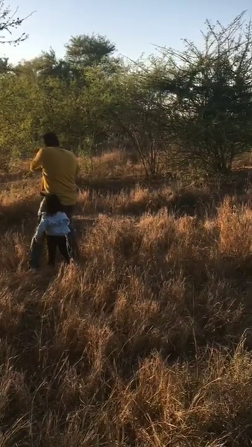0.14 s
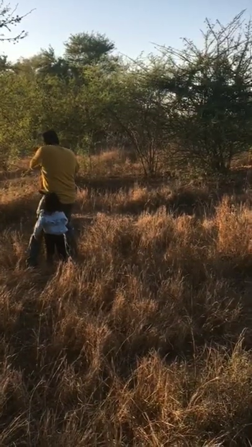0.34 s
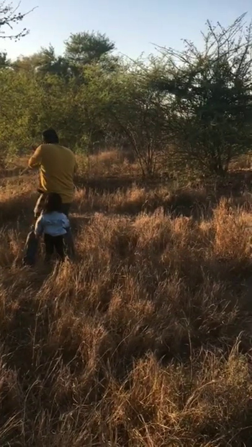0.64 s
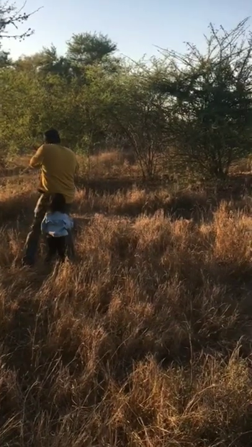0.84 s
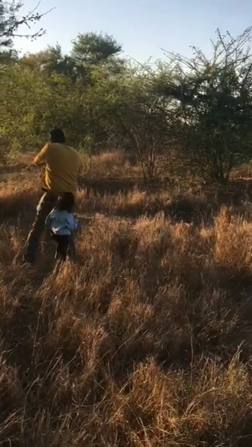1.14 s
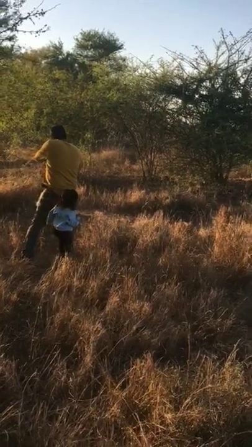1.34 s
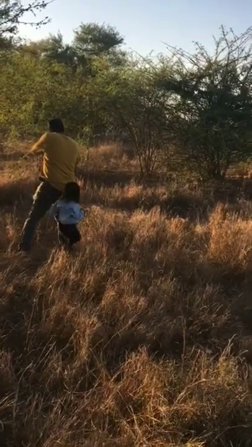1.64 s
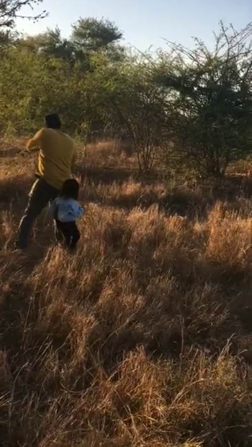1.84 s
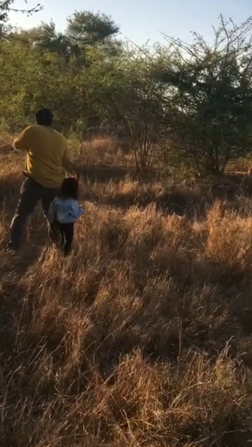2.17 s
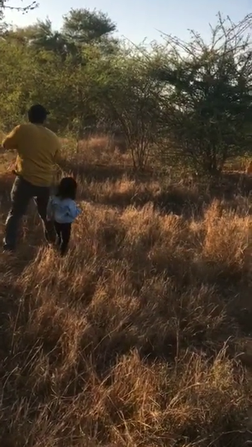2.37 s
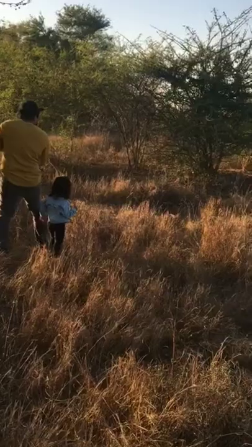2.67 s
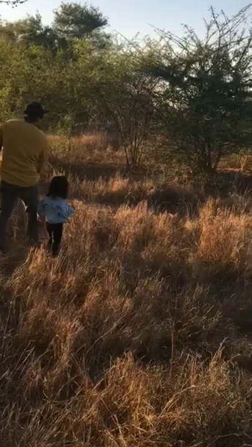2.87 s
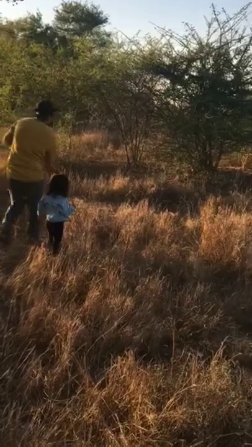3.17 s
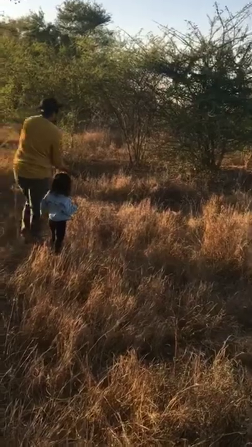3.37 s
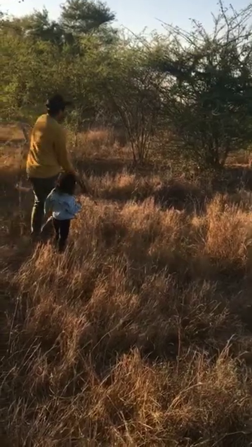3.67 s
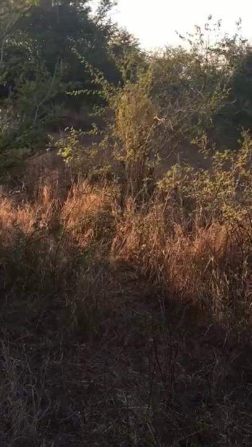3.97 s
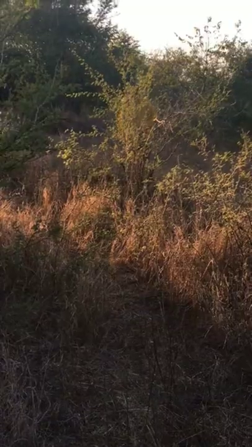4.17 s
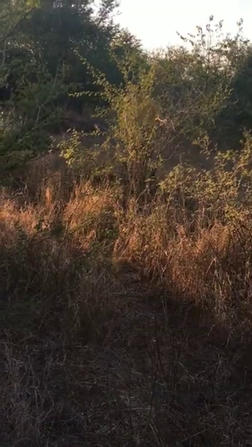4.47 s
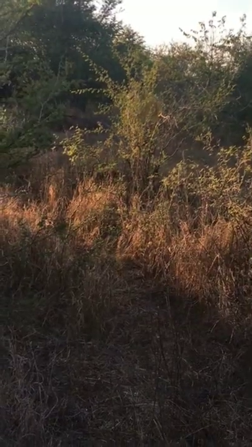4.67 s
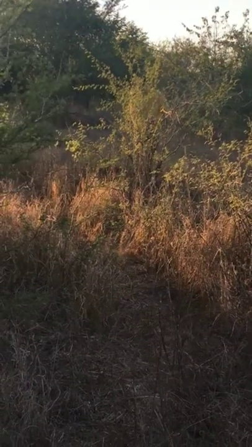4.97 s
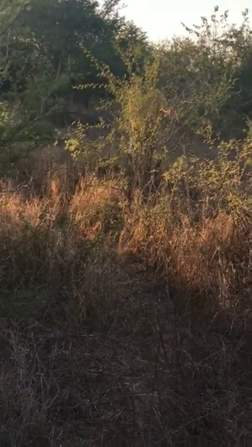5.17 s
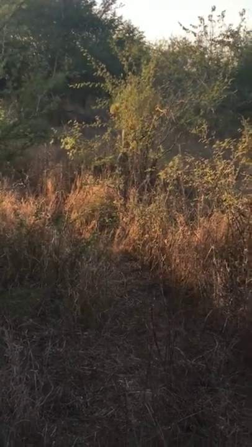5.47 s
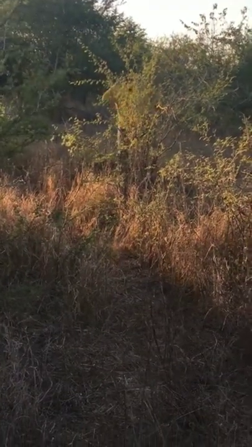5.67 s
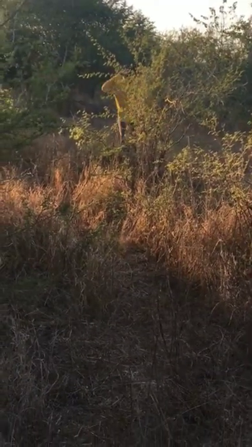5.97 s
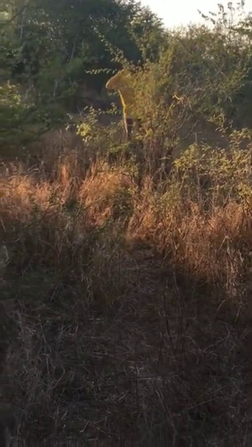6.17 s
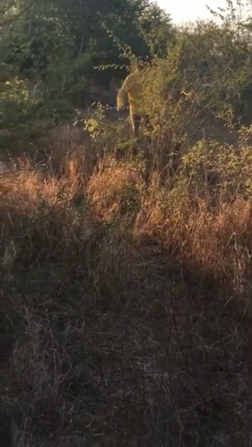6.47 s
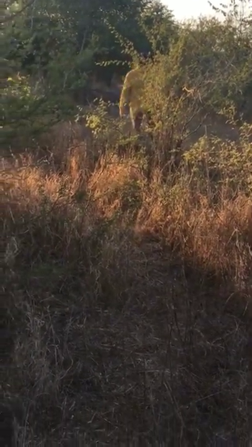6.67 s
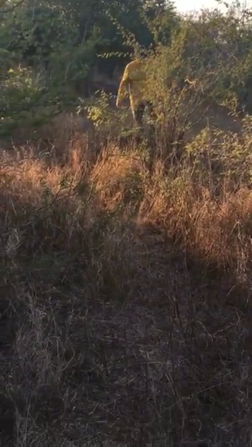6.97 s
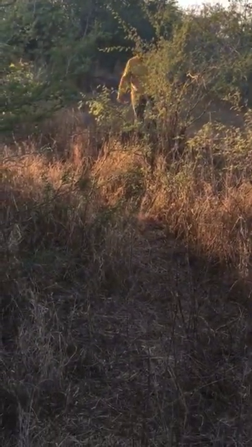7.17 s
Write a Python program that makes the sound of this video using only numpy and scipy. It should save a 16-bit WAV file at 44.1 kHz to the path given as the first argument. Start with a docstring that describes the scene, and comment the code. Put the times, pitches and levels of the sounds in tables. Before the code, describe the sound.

Quiet footsteps swish and crunch through dry grass, with one sharp branch crack, snapping stems, a few knocks and faint birds.

```python
"""Walking through dry grass

Close to a hand-held microphone, stalks swish and litter crunches: friction and fracture release
many tiny impulses. Stems snap, a dry branch cracks, and a few hard knocks ring in damped modes.
Birds call further off, faint thin tones come and go, and the open bush scatters these and the hits.
A breeze buffets the microphone with turbulent pressure. The sound drops out once for a moment."""
import sys
import numpy as np
from scipy import signal
from scipy.fft import rfft, irfft, next_fast_len
from scipy.io import wavfile
from scipy.ndimage import uniform_filter1d

SR = 44100
rng = np.random.default_rng(int(sys.argv[2]) if len(sys.argv) > 2 else 0)


def wav_record(signal):
    """Record a signal, one row per channel, as 16-bit PCM in the file named by sys.argv[1]."""
    frames = np.transpose(np.atleast_2d(signal))
    bounded = np.clip(frames, -1, 1)
    # unit amplitude maps onto the largest positive 16-bit level
    quanta = np.round(bounded * 32767).astype(np.int16)
    wavfile.write(sys.argv[1], SR, quanta)


N = 322812

# loudness of the walk: time_s, stalks_db, litter_db
WALK_LEVELS = [(0, -70.5, -69.5), (.5, -74.5, -72.5), (1.0, -68.5, -69.5), (1.4, -67, -65.5),
               (1.59, -60.5, -55.5), (1.9, -58.5, -58), (2.28, -70.5, -68), (2.5, -71.5, -71),
               (2.72, -64, -69.5), (3.65, -67, -66), (3.78, -60, -59), (4.0, -63, -61.5), (4.2, -73, -67.5),
               (4.44, -73, -68), (4.73, -61.5, -61.5), (5.09, -65, -64), (5.23, -58, -57),
               (5.53, -68.5, -66), (5.81, -62.5, -62), (5.96, -73.5, -68.5), (6.25, -68.5, -66.5),
               (6.99, -67.5, -64.5), (7.16, -59.5, -64.5)]
# spectra of light stalks and of trodden litter: frequency_hz, density_db
SWISH_SPECTRUM = [(2500, -23.5), (4000, -6), (5500, 6), (7500, 5), (9800, 7.5), (11400, -3.5),
                  (12400, -0.5)]
CRUNCH_SPECTRUM = [(400, -10), (900, -2), (1500, -2.5), (2200, 0.5), (3400, 2.5), (4600, 0.5), (5800, -4.5),
                   (7000, -21), (9000, -25)]
# interference dips from the bounce off the soil: centre_hz, width_hz, gain_db
GROUND_DIPS = [(3000, 1200, -3.5), (5000, 260, -7)]
def grass():
    """Many small contacts sum to noise; reflection from the soil partly cancels some bands."""
    stalks_db, litter_db = curves_at(WALK_LEVELS, np.arange(N) / SR)
    swish = coloured(crackle(N, per_s=480, spread_db=7.5, grain_s=.0019, hiss=3.6), SWISH_SPECTRUM)
    crunch = coloured(crackle(N, per_s=460, spread_db=3, grain_s=.005, hiss=1), CRUNCH_SPECTRUM)
    out = gain_of(stalks_db + .65 * drift(N, 900, passes=2)) * swish
    out += gain_of(litter_db + drift(N, 900, passes=2)) * crunch
    for row in TUFT_SWEEPS:
        add(out, *tuft_sweep(*row))
    for centre_hz, width_hz, gain_db in GROUND_DIPS:
        out -= (1 - gain_of(gain_db)) * resonate(out, centre_hz, width_hz)
    return out


# a leg sweeps a tuft: start_s, nominal_length_s, level_db, centre_hz
TUFT_SWEEPS = [(0.277, 0.061, -59, 6500), (1.594, 0.098, -51, 6240), (1.859, 0.17, -57, 8300),
               (1.975, 0.075, -60, 7000), (2.27, 0.045, -65, 7000), (2.464, 0.029, -66, 7970),
               (2.517, 0.099, -58.5, 8060), (2.593, 0.065, -62, 8950), (2.645, 0.04, -57, 7040),
               (2.846, 0.096, -54.5, 7800), (3.018, 0.021, -62.5, 7500), (3.143, 0.031, -65, 8000),
               (3.249, 0.021, -59.5, 7000), (3.38, 0.027, -62.5, 7560), (3.444, 0.11, -62, 9200),
               (3.645, 0.091, -55.5, 4040), (3.72, 0.026, -64, 3500), (3.819, 0.059, -62.5, 4000),
               (4.099, 0.085, -58.5, 3600), (4.165, 0.11, -62, 3580), (4.55, 0.13, -59, 4130),
               (4.737, 0.15, -57.5, 3580), (5.204, 0.028, -53.5, 3000), (5.294, 0.13, -62, 5000),
               (5.481, 0.12, -58.5, 4230), (5.83, 0.15, -57, 5000), (6.194, 0.22, -65, 5000),
               (6.442, 0.052, -72, 5000), (6.531, 0.31, -61.5, 4760), (6.692, 0.084, -56, 5000),
               (7.148, 0.029, -52, 2240), (7.136, 0.015, -57.5, 3000), (7.159, 0.1, -53, 3820)]
def tuft_sweep(start_s, nominal_length_s, level_db, centre_hz, stem_hz=2820, count=8000):
    """Friction excites broad resonances in a crackle that swells and thins as the stalks spring back."""
    progress = np.arange(count)[:round(1.3 * nominal_length_s * SR)] / (1.28 * nominal_length_s * SR)
    grains = crackle(count, per_s=1500, spread_db=2.3, grain_s=.0006, hiss=1)
    stalks = unit_rms(resonate_twice(grains, centre_hz, 1.57 * centre_hz))
    thick_stems = gain_of(-1.5) * unit_rms(resonate(grains, stem_hz, 1.65 * stem_hz))
    tuft = unit_rms((stalks + thick_stems)[:len(progress)])
    waver_db = 1.8 * drift(count, 500)[:len(progress)]
    swell = np.clip(np.minimum(progress / .2, (1 - progress) / .56), 0, 1)
    return start_s, gain_of(level_db + waver_db) * tuft * swell


def fracture(start_s, peak_db, tick_hz, body_db, body_hz, t60_s, ring, pulse, relative_width):
    """Brittle fracture: a pulse and decaying noise excite a bright tick and a duller body resonance."""
    t = np.arange(3000) / SR
    strain_s = .0003  # the fibres strain this long before they break
    envelope = gain_of(-60 * t / t60_s) * (1 - np.exp(-t / strain_s))
    spike = pulse * (np.arange(len(t)) == round(strain_s * SR))
    tick_drive, body_drive = rng.standard_normal((2, len(t))) * envelope + spike
    tick = resonate_twice(tick_drive, tick_hz, relative_width * tick_hz)
    tick += ring * resonate(tick_drive, tick_hz, .11 * tick_hz)  # the hollow stem rings briefly
    body = resonate(resonate(body_drive, body_hz, relative_width * body_hz / 2), body_hz, body_hz)
    return start_s, gain_of(peak_db) * (tick / abs(tick).max() + gain_of(body_db) * body / abs(body).max())


# breaking stalks: start_s, tick_peak_db, tick_hz, body_relative_db
STALK_SNAPS = [(0.2665, -48, 8690, -14), (0.288, -52, 8540, -4), (0.637, -49, 3840, -17),
               (0.671, -42.5, 5170, -26), (0.939, -55, 3700, -30), (0.987, -57, 4000, -30),
               (1.2964, -55.5, 3000, 1), (1.3415, -49, 2650, -4), (1.529, -35, 3700, -10),
               (1.55, -39, 3370, -6), (1.669, -41, 3250, -22), (1.774, -52, 2630, 7.5),
               (1.825, -49, 3410, 3.5), (1.8675, -40.5, 7960, -3), (2.146, -47, 3460, -5),
               (2.467, -52, 9400, -30), (2.522, -42, 8490, -23), (2.765, -44, 8800, -28),
               (3.2442, -55, 2200, 6), (3.3906, -56, 5000, 4), (3.6444, -47, 4000, -30),
               (3.7044, -44, 3810, -24), (3.744, -48, 3770, -2), (3.767, -45, 3400, -21),
               (3.7872, -38.5, 2900, -21), (3.788, -43, 9000, -30), (3.797, -47, 9000, -30),
               (3.827, -37, 4400, -17), (3.856, -38.5, 4520, -5), (3.87, -41, 8800, -29),
               (3.989, -54, 5400, -24), (4.1353, -48, 4170, -25), (4.1628, -44, 3700, -27),
               (4.2216, -43, 3760, -25), (4.4652, -44.5, 3730, -34), (4.626, -43, 3760, -31),
               (4.646, -43, 5000, -27), (4.7172, -43.5, 4630, -25), (4.8903, -42, 5600, -32),
               (4.991, -48, 3900, -25), (5.0548, -23, 5700, -20.5), (5.1098, -44, 3500, -15),
               (5.164, -45, 4130, -23), (5.2266, -33, 4050, -13), (5.279, -26, 5070, -36),
               (5.289, -35, 6500, -30), (5.293, -42, 5960, -21), (5.423, -42, 5800, -33),
               (5.524, -43, 4160, -19), (5.644, -52, 4200, -25), (5.6953, -58, 5000, -25),
               (5.815, -40, 5500, -22), (5.8378, -30, 8800, -8.5), (6.119, -49.5, 4900, -7),
               (6.181, -49.5, 5100, -25), (6.219, -48, 7000, -30), (6.2335, -49, 8500, -30),
               (6.26, -44, 5360, -29.5), (6.2836, -44, 6900, -30), (6.301, -51, 8500, -30),
               (6.375, -46.5, 6000, -10), (6.438, -46, 5300, -25), (6.441, -42.5, 5070, -25),
               (6.452, -45, 5500, -30), (6.4723, -46, 6500, -25), (6.504, -46.5, 5500, -30),
               (6.517, -46, 5520, -32), (6.5413, -41, 5300, -30), (6.547, -39, 5460, -31),
               (6.5605, -33, 5170, -17.5), (6.569, -43, 5300, -30), (6.582, -45, 5230, -30),
               (6.5945, -49, 5200, -30), (6.625, -46, 5970, -30), (6.6958, -48, 5500, -30),
               (6.7255, -48, 5970, -18), (6.763, -57, 5000, -25), (7.151, -39, 2400, -11),
               (7.1565, -44, 2250, -8), (7.1602, -45, 2000, 0), (7.199, -42, 3150, -12)]
def stalk_snaps(small_count=14):
    """Hollow stalks fracture and resonate; small ones break at random, as loud as the tread is heavy."""
    when, size, pitch = rng.random((small_count, 3)).T
    start_s = when * N / SR
    _, litter_db = curves_at(WALK_LEVELS, start_s)
    peak_db = litter_db + 14 + 4 * (2 * size - 1)
    small = [(*row, -33) for row in zip(start_s, peak_db, 4500 * 2 ** (pitch - .5))]
    return [fracture(*row, body_hz=1795, t60_s=.0099, ring=1.8, pulse=3, relative_width=2)
            for row in STALK_SNAPS + small]


# the branch splits: start_s, tick_peak_db, tick_hz, body_relative_db, body_hz, t60_s
BRANCH_CRACKS = [(1.4187, -1, 8200, -5, 3700, .004), (1.4216, -9.5, 8200, -5, 3300, .004),
                 (1.4245, -18, 8000, -4, 2600, .004), (1.4371, -8, 7600, -7, 3200, .004),
                 (1.4885, -15, 8200, 1, 4200, .008), (1.4908, -23, 8000, -2, 4500, .012),
                 (1.6324, -39, 6500, 7, 2000, .005), (1.635, -44, 7000, 6, 2900, .006)]
def branch_cracks():
    """Dry wood releases its strain in sharp pulses with little ringing."""
    return [fracture(*row, ring=.3, pulse=13, relative_width=.75) for row in BRANCH_CRACKS]


# loudness of the tear: time_s, level_db
TEAR_LEVELS = [(1.417, -25), (1.42, -26), (1.426, -29), (1.431, -29), (1.445, -34.5), (1.46, -29.5),
               (1.47, -35.5), (1.484, -40), (1.492, -36), (1.51, -47), (1.6, -56.5)]
# spectrum of tearing wood: frequency_hz, density_db
TEAR_SPECTRUM = [(88, -35), (150, -10), (748, -11), (951, -1.5), (1140, -10.5), (1990, -8.5), (3100, -6),
                 (5000, -4), (6500, -2.5), (8560, -4.5), (12400, -13), (16100, -47.5), (22000, -120)]
def branch_tear():
    """Progressive fracture: fibres give way one after another in a dense crackle."""
    t = np.arange(TEAR_LEVELS[0][0], TEAR_LEVELS[-1][0], 1 / SR)
    fibres = coloured(crackle(len(t), per_s=2500, spread_db=2.6, grain_s=.0008, hiss=.8), TEAR_SPECTRUM)
    return t[0], gain_of(curves_at(TEAR_LEVELS, t)[0]) * fibres * signal.windows.tukey(len(t), .01)


# blows on a hard body and a duller stick: start_s, level_db, tilt_db_per_octave, lowest_mode_db
HARD_KNOCKS = [(3.6585, -28, 3, 4), (3.813, -29, 2.5, 4), (4.02, -56, -4, -13)]
STICK_BUMPS = [(3.542, -48.5, -6, -24), (3.552, -41.5, 1, -2)]
# their natural modes: frequency_hz, level_db, t60_s
HARD_MODES = [(1210, -1, 0.013), (1895, 3, 0.011), (2610, 2, 0.009), (3230, -5, 0.011), (3630, 0, 0.0061),
              (4400, -0.5, 0.0077), (5290, -1.5, 0.0075), (5610, -8, .006), (6180, -1.5, 0.0076),
              (6900, -7, 0.008), (7450, 1.5, 0.0061), (7750, -2, 0.0052), (8300, -4.5, 0.0056),
              (9400, -7, .006), (10000, -6.5, 0.0069), (10900, -12, 0.006), (11700, -16, .005)]
STICK_MODES = [(760, -2, 0.011), (1230, -1.5, .011), (1760, -1, .01), (2600, -9, .008), (3240, -8, .006),
               (4320, -7, 0.008), (5700, -14, .006)]
def knock(start_s, level_db, tilt_db_per_octave, lowest_mode_db, modes, cutoff_hz):
    """Modal vibration: a rattling contact rings a body too small to radiate below its cutoff."""
    t = np.arange(3000) / SR
    contact_s, blow_s = .0028, .006
    rattle = rng.standard_normal(len(t)) * np.exp(-(t / contact_s) ** 2) * (rng.random(len(t)) < .3)
    force = (t == 0) + .18 * rattle
    ring = np.zeros(len(t))
    for k, (hz, mode_db, t60_s) in enumerate(modes):
        struck_db = mode_db + tilt_db_per_octave * np.log2(hz / 2000) + lowest_mode_db * (k == 0)
        ring += (-1) ** k * gain_of(struck_db - 60 * t / t60_s) * np.sin(2 * np.pi * hz * t)
    vibration = signal.fftconvolve(force, ring)[:len(t)]
    radiated = signal.sosfilt(signal.butter(8, cutoff_hz, "high", fs=SR, output="sos"), vibration)
    # the energy equals that of level_db held for blow_s
    return start_s, gain_of(level_db) * unit_rms(radiated) * np.sqrt(blow_s * SR / len(t))


# dull thumps: start_s, peak_db, pitch_hz, t60_s
THUMPS = [(1.331, -43, 51.3, 0.7), (1.403, -34.5, 53.4, 0.19), (1.419, -23.5, 425, 0.019),
          (1.421, -36.5, 610, 0.03), (1.44, -58, 760, 0.48), (1.459, -27.5, 1970, 0.031),
          (0.671, -45.5, 1000, 0.013), (5.225, -42.5, 296, 0.011), (5.589, -52.5, 41, 0.69),
          (5.831, -54, 45.6, 0.23)]
def thump(start_s, peak_db, pitch_hz, t60_s):
    """A damped oscillator: one sinusoid decays exponentially."""
    t = np.arange(5000) / SR
    return start_s, gain_of(peak_db - 60 * t / t60_s) * np.sin(2 * np.pi * pitch_hz * t)


# arched bird whistles: start_s, top_hz, level_db, octave_db
ARCHED_CALLS = [(0.084, 1655, -95, -70.5), (2.062, 1705, -70, -71)]
def arched_call(start_s, top_hz, level_db, octave_db):
    """Slow frequency modulation: the pitch rises and falls back."""
    return glide(start_s, .178, .89 * top_hz, top_hz, .88 * top_hz, level_db, octave_db, taper=.12)


# chips of a nearer bird: start_s, middle_hz, level_db, octave_db
CHIP_CALLS = [(0.081, 2000, -59, -58), (0.516, 1975, -61, -59), (2.011, 2060, -63, -50),
              (2.413, 2000, -61.5, -50), (2.724, 1960, -72, -58)]
def chip(start_s, middle_hz, level_db, octave_db):
    """Fast frequency modulation: a very short tone that ends in a fall is heard as a chip."""
    return glide(start_s, .026, .95 * middle_hz, middle_hz, .78 * middle_hz, level_db, octave_db, rasp=.2)


# hoarse bird notes: start_s, length_s, centre_hz, width_hz, level_db
HOARSE_CALLS = [(2.264, 0.047, 3730, 1230, -62), (2.732, 0.013, 3680, 1000, -60)]
def churr(start_s, length_s, centre_hz, width_hz, level_db):
    """Source and filter: a narrow throat shapes a burst of noise."""
    noise = rng.standard_normal(round(length_s * SR))
    throat = unit_rms(resonate_twice(noise, centre_hz, width_hz))
    return start_s, gain_of(level_db) * throat * signal.windows.tukey(len(noise), .3)


# faint thin tones, mostly high: start_s, length_s, start_hz, middle_hz, end_hz, level_db
FAINT_TONES = [(.59, .033, 790, 770, 765, -68.5), (.71, .04, 6200, 6200, 6150, -69),
               (.727, .13, 7860, 7950, 7740, -74), (.74, .11, 5350, 5250, 5200, -77),
               (.75, .09, 6050, 5950, 5900, -75), (.835, .03, 3150, 3250, 3700, -71),
               (.914, .033, 780, 765, 770, -65), (1.19, .09, 6840, 7000, 6800, -75),
               (3.045, .2, 7800, 7350, 6900, -70), (3.049, .032, 6200, 4350, 3250, -60),
               (3.115, .15, 3500, 3720, 3780, -73), (4.398, .05, 2850, 2780, 2600, -69),
               (4.725, .07, 2300, 2750, 2000, -66), (5.932, .034, 5680, 4500, 3700, -64),
               (6.935, .022, 2800, 2820, 2830, -68), (6.96, .052, 3020, 3220, 2900, -66),
               (7.063, .032, 3000, 3250, 3420, -65), (7.236, .03, 4700, 4000, 3450, -63)]
def glide(start_s, length_s, start_hz, middle_hz, end_hz, level_db, octave_db=-120, rasp=.35, taper=.4):
    """A gliding tone with an optional octave, randomly modulated in frequency and amplitude."""
    count = round(length_s * SR)
    parabola = np.polyfit([0, .5, 1], [start_hz, middle_hz, end_hz], 2)
    glide_hz = np.polyval(parabola, np.linspace(0, 1, count))
    wobble = 1 + .003 * drift(12000, 300)[:count]
    phase = 2 * np.pi * np.cumsum(wobble * glide_hz) / SR
    flutter = 1 + rasp * drift(12000, 40)[:count]
    tone = gain_of(level_db) * np.sin(phase) + gain_of(octave_db) * np.sin(2 * phase)
    return start_s, flutter * tone * signal.windows.tukey(count, taper)


# gusts added to the calm breeze: start_s, length_s, buffet_db, roar_db
WIND_GUSTS = [(0.55, 0.056, -69, -93), (0.817, 0.95, -95, -80.5), (1.314, 0.26, -58, -73),
              (1.564, .12, -62, -73), (1.697, 0.35, -58.5, -72), (2.012, 0.26, -53, -89),
              (2.431, 0.13, -63, -89), (2.646, 0.19, -67, -92), (3.0, 0.34, -84, -107),
              (3.464, 0.13, -86, -77), (5.191, 0.051, -68, -68), (5.597, 0.12, -75, -78),
              (5.688, 0.46, -89, -74), (6.953, 0.46, -89, -77)]
# spectra of buffeting, dull roar and still background: frequency_hz, density_db
BUFFET_SPECTRUM = [(18, -37.5), (30, -20.5), (49, 2.5), (75, 2), (134, -6), (189, -7.5), (286, -17.5),
                   (400, -32.5), (520, -46), (880, -120)]
ROAR_SPECTRUM = [(150, -13), (260, -1.5), (380, -2), (520, -10.5), (800, -13.5), (1500, -39.5)]
AIR_SPECTRUM = [(25, -31), (45, -24), (70, -13), (140, -3.5), (300, -10), (700, -13.5), (1500, -18.5),
                (3000, -27), (6000, -51), (11000, -40.5), (12400, -63.5)]
def breeze(calm_buffet_db=-68.5, calm_roar_db=-77.5, air_db=-72, rise_s=.018, fall_share=.48):
    """Turbulence at the microphone makes lumpy low noise, and a dull roar swells along with it at each gust."""
    buffet_gain, roar_gain = np.ones((2, N)) * gain_of([[calm_buffet_db], [calm_roar_db]])
    for start_s, length_s, buffet_db, roar_db in WIND_GUSTS:
        t = np.arange(0, length_s, 1 / SR)
        swell = np.clip(np.minimum(t / rise_s, (1 - t / length_s) / fall_share), 0, 1)
        add(buffet_gain, start_s, gain_of(buffet_db) * swell)
        add(roar_gain, start_s, gain_of(roar_db) * swell)
    flurry_db = 2 * drift(N, 1500) + 3 * drift(N, 2500, passes=2)
    buffet = coloured(gain_of(flurry_db) * rng.standard_normal(N), BUFFET_SPECTRUM)
    roar = coloured(rng.standard_normal(N), ROAR_SPECTRUM)
    air = coloured(rng.standard_normal(N), AIR_SPECTRUM)
    return buffet_gain * buffet + roar_gain * roar + gain_of(air_db) * air


# decay of sound among grass and shrubs: frequency_hz, t60_s
BUSH_DECAY = [(300, 0.052), (2000, 0.097), (10000, 0.13)]
def bush_scatter(x):
    """Scattering: sparse echoes of random sign form a tail in which each band decays at its own rate."""
    echoes = np.zeros(SR // 4)
    slots = np.arange(120, len(echoes) - 20, 20)
    echoes[slots + rng.integers(0, 20, len(slots))] = rng.choice([-1., 1.], len(slots))
    hz, t, bands = signal.stft(echoes, SR, nperseg=256)
    decay = gain_of(-60 * t / spectrum_at(BUSH_DECAY, hz)[:, None])
    _, tail = signal.istft(bands * decay, SR, nperseg=256)
    return signal.fftconvolve(x, tail / np.linalg.norm(tail))[:N]


def crackle(count, per_s, spread_db, grain_s, hiss):
    """Shot noise: tiny random bursts of widely spread sizes over an even hiss."""
    sizes = gain_of(spread_db * np.minimum(rng.exponential(1, count), 5))
    impulses = sizes * (rng.random(count) < per_s / SR)
    power = signal.lfilter([1], [1, -np.exp(-2 / (grain_s * SR))], impulses ** 2)
    return np.sqrt(power / power.mean() + hiss ** 2) * rng.standard_normal(count)


def drift(count, window_samples, passes=1):
    """Moving averages turn white noise into a slow fluctuation of rms 1."""
    noise = rng.standard_normal(count)
    for _ in range(passes):
        noise = uniform_filter1d(noise, window_samples)
    return unit_rms(noise)


def resonate(x, centre_hz, width_hz):
    """A two-pole resonance of peak gain near 1."""
    r2 = np.exp(-2 * np.pi * width_hz / SR)  # squared pole radius
    feedback = [1, -(1 + r2) * np.cos(2 * np.pi * centre_hz / SR), r2]
    return signal.lfilter([(1 - r2) / 2, 0, (r2 - 1) / 2], feedback, x)


def resonate_twice(x, centre_hz, width_hz):
    """Two equal resonances in cascade have steeper skirts."""
    return resonate(resonate(x, centre_hz, width_hz), centre_hz, width_hz)


def coloured(x, spectrum):
    """Filters x by a spectrum table and scales it to rms 1."""
    size = next_fast_len(len(x))
    response = gain_of(spectrum_at(spectrum, np.fft.rfftfreq(size, 1 / SR)))
    return unit_rms(irfft(rfft(x, size) * response, size)[:len(x)])


def spectrum_at(table, hz):
    """Interpolates a table over log frequency."""
    table_hz, values = np.transpose(table)
    return np.interp(np.log(hz + 1), np.log(table_hz + 1), values)


def curves_at(table, t):
    """Interpolates each level column over time."""
    time_s, *curves = np.transpose(table)
    return [np.interp(t, time_s, curve) for curve in curves]


def gain_of(db):
    """Decibels to amplitude ratio."""
    return 10 ** (np.asarray(db) / 20)


def unit_rms(x):
    """Scales to rms 1."""
    return x / np.sqrt(np.mean(x ** 2) + 1e-20)


def add(mix, start_s, sound):
    """Superposes a sound on the mix from start_s."""
    part = mix[round(start_s * SR):][:len(sound)]
    part += sound[:len(part)]


def scene():
    """Superposition: hits, bird calls and faint tones, scattered by the bush, over grass and breeze."""
    hits, notes = np.zeros((2, N))
    impacts = stalk_snaps() + branch_cracks()
    impacts += [knock(*row, HARD_MODES, cutoff_hz=1060) for row in HARD_KNOCKS]
    impacts += [knock(*row, STICK_MODES, cutoff_hz=600) for row in STICK_BUMPS]
    impacts += [thump(*row) for row in THUMPS]
    for start_s, sound in impacts + [branch_tear()]:
        add(hits, start_s, sound)
    for source, table in ((arched_call, ARCHED_CALLS), (glide, FAINT_TONES),
                          (chip, CHIP_CALLS), (churr, HOARSE_CALLS)):
        for row in table:
            add(notes, *source(*row))
    scattered = bush_scatter(gain_of(-12.5) * hits + gain_of(-10.5) * notes)
    return (hits + notes + scattered + grass() + breeze())[None]


# the microphone peaks, then dulls at the very top: frequency_hz, gain_db
MICROPHONE_RESPONSE = [(10500, 0), (11400, 4.5), (12000, -6.5), (12500, -9)]
def record(dry):
    """The sound ducks, fades to silence and returns; the microphone's response and a low-pass follow."""
    dropout_s, fade_s, return_s = 3.926, .02, 3.987
    duck_db, fade_db_per_s, cutoff_hz = -20, -900, 12150
    t = np.arange(N) / SR
    fade = gain_of(duck_db + fade_db_per_s * np.clip(t - dropout_s, 0, 1)) * (t < dropout_s + fade_s)
    gate = uniform_filter1d(np.where((t < dropout_s) | (t > return_s), 1, fade), 50)
    response = gain_of(spectrum_at(MICROPHONE_RESPONSE, np.fft.rfftfreq(N, 1 / SR)))
    picked_up = irfft(rfft(dry * gate) * response, N)
    low_pass = signal.firwin(511, cutoff_hz, window=("kaiser", 9), fs=SR)
    return signal.oaconvolve(picked_up, low_pass[None], "same")


dry = scene()
out = record(dry)
wav_record(out)
```